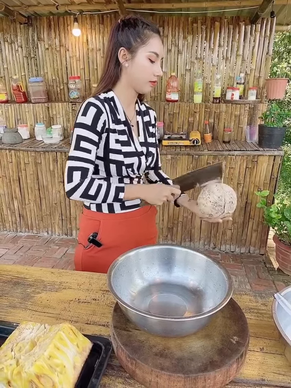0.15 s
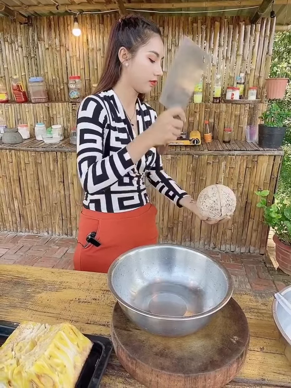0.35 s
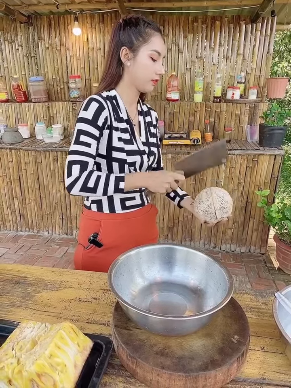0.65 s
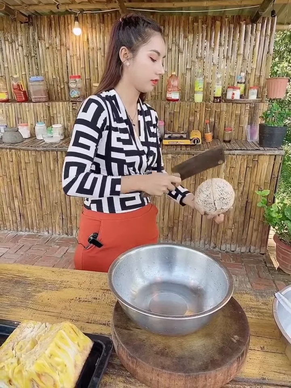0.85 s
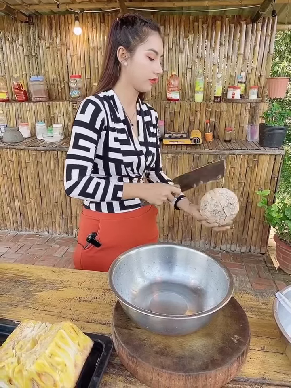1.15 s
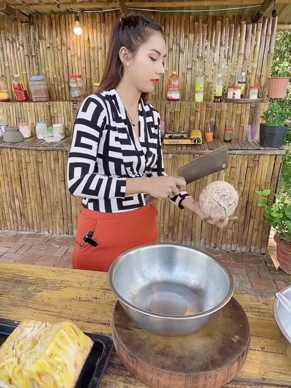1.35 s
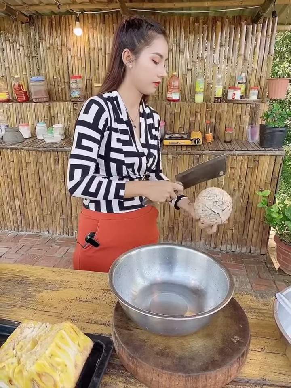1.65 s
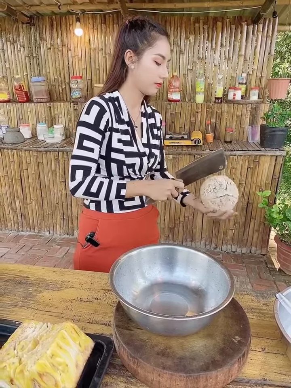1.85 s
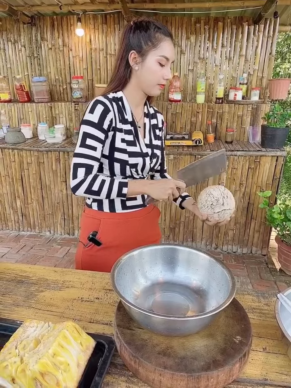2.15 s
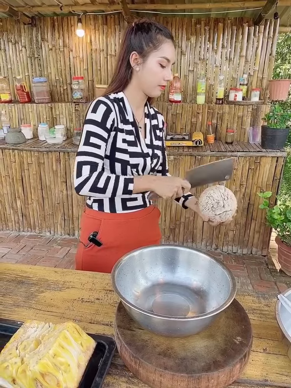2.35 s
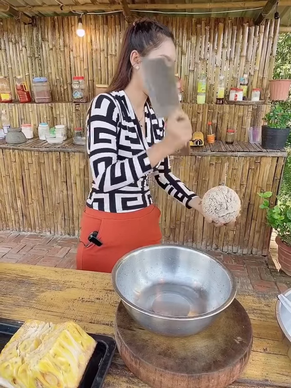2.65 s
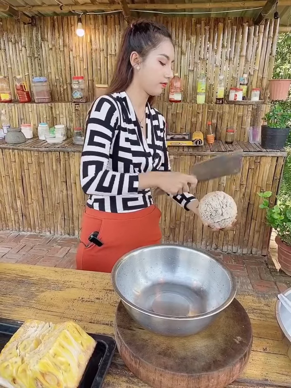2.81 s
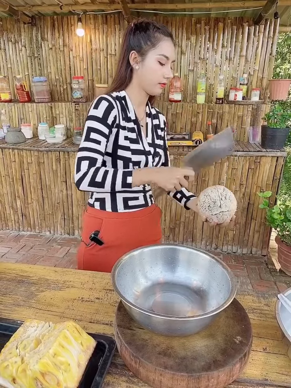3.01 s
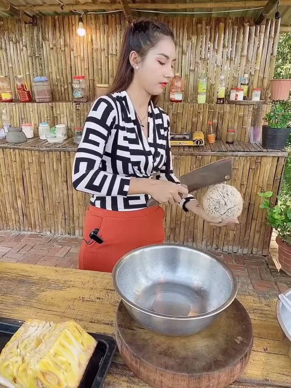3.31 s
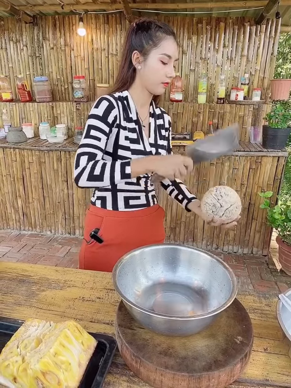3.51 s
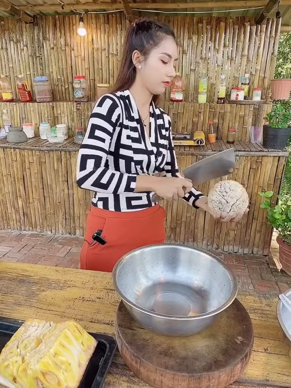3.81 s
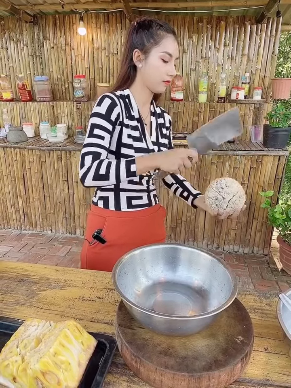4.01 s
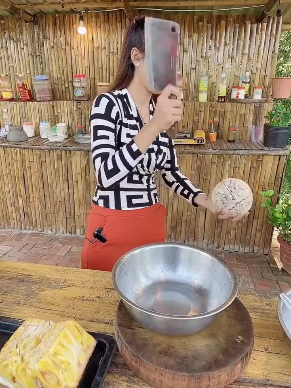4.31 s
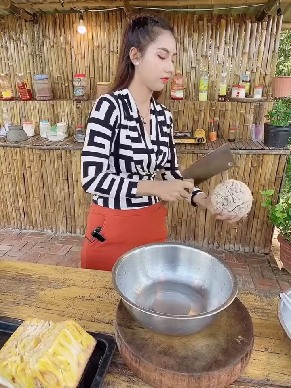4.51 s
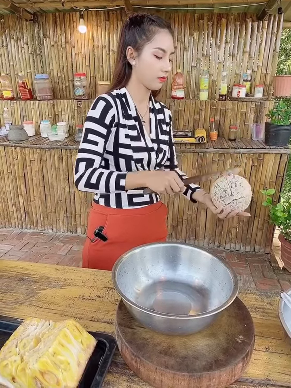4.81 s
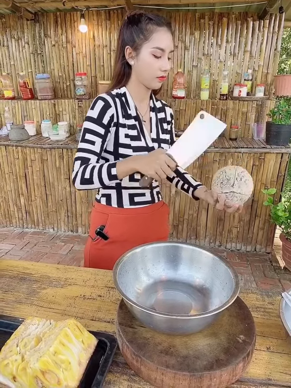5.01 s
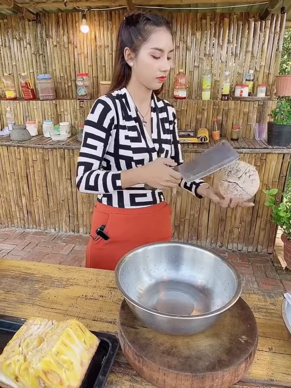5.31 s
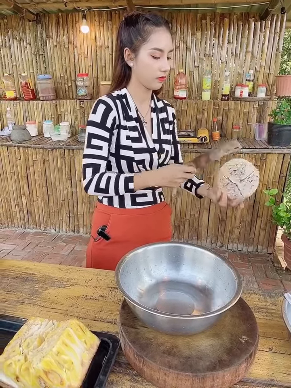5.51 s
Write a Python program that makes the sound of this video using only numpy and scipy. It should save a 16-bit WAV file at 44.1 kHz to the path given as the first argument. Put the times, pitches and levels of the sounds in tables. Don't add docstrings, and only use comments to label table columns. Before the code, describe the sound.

Sharp, crackling coconut knocks come close to a phone microphone and clip it slightly. After the first blow there is a pause with chick peeps and fingers brushing husk, then five strikes of varied strength, some with steely ringing. Small water glugs sound between blows. Nearby bamboo walls give a short, scattered echo over distant insects and low wind.

```python
import sys
import numpy as np
from scipy import signal
from scipy.fft import rfft, irfft
from scipy.io import wavfile
from scipy.ndimage import uniform_filter1d

SR = 44100
rng = np.random.default_rng(int(sys.argv[2]) if len(sys.argv) > 2 else 0)


def unload_wav(signal):
    wavfile.write(
        sys.argv[1],
        SR,
        np.round(np.clip(np.atleast_2d(signal).T, -1, 1) * 32767).astype(np.int16),
    )


def makeup_ratio(level_db):
    decades = np.asarray(level_db, float) / 20
    return 10 ** decades


N = 249606
LEAD = SR // 2
CRACKED_S = 1.5
BRIGHT_HZ = 1500

# (frequency [Hz], time to fade 60 dB [s])
SHED_NEAR = [(100, 0.067), (300, 0.047), (1000, 0.14), (4000, 0.15), (9000, 0.12), (11000, 0.093),
             (15000, 0.03)]


def evened(x):
    return x / np.sqrt(np.mean(x ** 2) + 1e-20)


def read(points, hz):
    f, value = np.transpose(points)
    return np.interp(np.log(hz + 1), np.log(f + 1), value)


def add(mix, s, sound):
    part = mix[round(s * SR) + LEAD:][:len(sound)]
    part += sound[:len(part)]


def uneven(size, samples):
    return evened(uniform_filter1d(rng.standard_normal(size), samples))


def coloured(points, size):
    gain = makeup_ratio(read(points, np.fft.rfftfreq(size, 1 / SR)))
    return evened(irfft(rfft(rng.standard_normal(size)) * gain, size))


def causal(points):
    half = np.log(makeup_ratio(np.maximum(read(points, np.fft.rfftfreq(4096, 1 / SR)), -100)))
    whole = np.concatenate([half, half[-2:0:-1]])
    taps = np.fft.ifft(np.exp(whole - 1j * signal.hilbert(whole).imag)).real[:2048]
    return taps / np.linalg.norm(taps)


def resonate(x, hz, width):
    turn = np.exp(2j * np.pi * np.cumsum(hz * np.ones(len(x))) / SR)
    r = np.exp(-np.pi * width / SR)
    return 2 * (turn * signal.lfilter([1 - r], [1, -r], x / turn)).real


def ringing(hz, db, t60, t):
    level_db = db[:, None] - 60 * np.maximum(t - .04, -.02) / t60[:, None]
    return makeup_ratio(level_db) * np.sin(2 * np.pi * hz[:, None] * t)


def echo_tail(decays):
    taps = np.zeros(SR)
    at = np.arange(260, SR - 20, 20)
    taps[at + rng.integers(0, 20, len(at))] = rng.choice([-1., 1.], len(at))
    hz, t, z = signal.stft(taps, SR, nperseg=256)
    fade = makeup_ratio(-60 * t / read(decays, hz)[:, None])
    tail = signal.istft(z * fade, SR, nperseg=256)[1]
    return tail / np.linalg.norm(tail)


def shed(x):
    # (frequency [Hz], time to fade 60 dB [s])
    far_walls = [(100, 0.27), (600, 0.61), (2000, 0.54), (5000, .65), (8500, 0.38), (12000, 0.62),
                 (14500, 0.094)]
    return signal.fftconvolve(x, echo_tail(SHED_NEAR) + makeup_ratio(-20) * echo_tail(far_walls))


def patchy_top(x):
    top = signal.oaconvolve(x, signal.firwin(255, 12550, pass_zero=False, fs=SR), "same")
    missing = 1. * (uneven(N, 3000) < 0)
    return x - top * uniform_filter1d(missing, 600)


def insects():
    # (frequency [Hz], level [dB per Hz])
    hiss_colour = [(90, -27), (150, 2.5), (250, -5), (450, -3), (1000, -14.5), (2500, -15.5), (7200, -21),
                   (8600, -13.5), (9700, -21), (11400, -13.5), (12400, -16), (12600, -26.5), (14700, -29.5),
                   (15700, -45)]
    level_db = -59.5 + .8 * uneven(N, 6000)
    return patchy_top(makeup_ratio(level_db) * coloured(hiss_colour, N))


def breeze():
    # (frequency [Hz], level [dB per Hz])
    rumble_colour = [(5.9, -26), (10, 4.5), (64, -6), (85, -6.5), (103, -10), (140, -16), (250, -33),
                     (320, -47), (550, -120)]
    # (time [s], level [dB])
    gusts = [(0.0, -51.5), (0.65, -50), (2.11, -51), (3.01, -50.5), (3.47, -49.5), (3.91, -48.5),
             (4.34, -51), (4.76, -46), (5.04, -54), (5.66, -52)]
    gust_db = np.interp(np.arange(N) / SR, *np.transpose(gusts))
    return makeup_ratio(gust_db + 3.1 * uneven(N, 2500) + 3.0) * coloured(rumble_colour, N)


def peep(s, length, top_hz, first_db, other_db):
    u = np.linspace(-1, 1, round(length * SR))
    rising = u < 0
    hz = top_hz * (1 - np.where(rising, .5, .55) * abs(u) ** np.where(rising, 2.1, 2.4))
    turns = 2 * np.pi * np.cumsum(hz) / SR
    hoarse, patchy = evened(uniform_filter1d(rng.standard_normal((2, len(u))), 120))
    first = makeup_ratio(first_db - np.where(rising, 95, 65) * u ** 4 + 1.5 * hoarse) * np.sin(turns)
    second = makeup_ratio(-68.5 + 9 * u ** 2 * rising + 3 * patchy) * np.sin(2 * turns)
    other_hz = 11150 - 1300 * np.exp(-(u + 1) / 0.5)
    other = makeup_ratio(other_db + 4.0 * hoarse) * np.sin(2 * np.pi * np.cumsum(other_hz) / SR)
    return s, np.sqrt(2) * (first + second + other) * signal.windows.tukey(len(u), .3)


def chicks():
    # (time [s], length [s], top pitch [Hz], first partial [dB], neighbour's whistle [dB])
    peeps = [(0.19, .082, 4703, -55.5, -97), (0.492, 0.11, 4796, -56, -71), (1.087, .12, 5024, -49, -74),
             (1.425, .13, 4986, -52.5, -71), (3.7, .09, 4326, -69.5, -90), (5.05, .085, 4212, -64, -91.5),
             (5.36, .11, 4850, -58, -79), (5.612, .085, 5030, -55.5, -80)]
    # (frequency [Hz], time to fade 60 dB [s])
    hen_yard = [(3000, .4), (6000, .35), (11000, .15)]
    mix = np.zeros(N + LEAD)
    for row in peeps:
        add(mix, *peep(*row))
    mix += makeup_ratio(-5.5) * signal.fftconvolve(mix, echo_tail(SHED_NEAR))[:len(mix)]
    mix += makeup_ratio(-11) * signal.fftconvolve(mix, echo_tail(hen_yard))[:len(mix)]
    return mix


def touch(s, db, hz, t60):
    t = np.arange(2500) / SR
    scrape = resonate(resonate(rng.standard_normal(len(t)), hz, hz), hz, 0.71 * hz)
    return s, makeup_ratio(db - 60 * t / t60) * evened(scrape)


def glug(s, db, start_hz, end_hz, t60):
    t = np.arange(round(t60 * SR)) / SR
    hz = end_hz + (start_hz - end_hz) * np.exp(-t / (0.13 * t60))
    tone = np.sin(2 * np.pi * np.cumsum(hz) / SR) * (1 - np.exp(-t / 0.0011))
    return s, makeup_ratio(db - 60 * (t / t60) ** 1.1) * tone


def steady_ring(s, db, hz, t60):
    return glug(s, db, hz, hz, t60)


def swing(end, db, length, hz):
    rise = np.linspace(0, 1, round(length * SR))
    rising_hz = hz * (.7 + .5 * rise)
    air = resonate(resonate(rng.standard_normal(len(rise)), rising_hz, 300), rising_hz, 400)
    return end - length, makeup_ratio(db) * evened(air) * rise ** 1.1


def hollow(x):
    return signal.sosfilt(signal.butter(4, 270, "high", fs=SR, output="sos"), x)


def tilt_db(hz, bright_db):
    octaves = max(np.log2(hz / BRIGHT_HZ), 0)
    return bright_db * (min(octaves, 1.1) if bright_db < 0 else octaves)


def crackling(t60, t):
    noise = rng.standard_normal(SR)
    lumps_db = 3.0 * evened(uniform_filter1d(noise[::-1], size=160))
    crackle = noise * makeup_ratio(-60 * t / t60 + lumps_db)
    top = signal.sosfilt(signal.butter(2, 9400, "high", fs=SR, output="sos"), crackle)
    crackle -= top * (1 - makeup_ratio(-60 * t / 0.34))
    crackle[0] += 4.0
    return crackle


def knocked_shell(s, knock_db, bright_db, tap):
    # (frequency [Hz], level [dB per Hz])
    full_colour = [(88, -48), (150, -16), (370, 0), (900, -7), (1740, -8), (2400, -9), (9000, -19.5),
                   (15700, -34.5)]
    tap_colour = [(88, -44.5), (240, -26.5), (400, 0), (1200, -5.5), (1760, -1.5), (3300, -9),
                  (6000, -21.5), (15700, -33.5)]
    colour = []
    for f, db in (full_colour, tap_colour)[tap]:
        early_db = -5 * (s < CRACKED_S and f < BRIGHT_HZ)
        colour.append((f, db + tilt_db(f, bright_db) + early_db))
    return makeup_ratio(knock_db) * hollow(np.pad(causal(colour), (0, 2048)))


def shell_thud(s, thud_db, bright_db, tap, t):
    # (frequency [Hz], time to fade 60 dB [s], full blow [dB], tap [dB])
    thud_modes = [(316, 0.12, -8, -31), (415, 0.063, -11.5, -6), (654, .05, -13.5, -29),
                  (883, 0.021, -16.5, -6), (1400, 0.014, -13.5, -17.5), (2440, 0.016, -3.5, -9.5),
                  (3208, 0.012, 0.7, -14.5)]
    thuds = []
    for f, fade, *db in thud_modes:
        level_db = thud_db + db[tap] + tilt_db(f, bright_db) - 60 * t / fade
        thuds.append(makeup_ratio(level_db) * np.sin(2 * np.pi * f * t))
    return hollow(makeup_ratio(-13.5 * (s < CRACKED_S)) * thuds[0] + sum(thuds[1:]))


def shell_ring(thud_db, tap, t):
    # (frequency [Hz], time to fade 60 dB [s], full blow [dB], tap [dB])
    shell_modes = [(333.6, 0.28, -27.5, -53.5), (464.7, .18, -24.5, -42), (528, .17, -37, -69.5),
                   (619, 0.14, -27, -56.5), (799, 0.15, -29.5, -49.5), (958, 0.1, -34, -60),
                   (1195, 0.22, -36, -40.5)]
    hz, ring_s, *db = np.transpose(shell_modes)
    return ringing(hz, db[tap] + thud_db, ring_s, t).sum(0)


def blade(place, hum_db, over_db, grip, tap, t):
    overtone_hz = [2118, 4538, 5184, 8107, 8870, 9160, 10160, 10735, 10850, 11390, 12230, 12920, 13610]
    # (time to fade 60 dB [s], struck at heel [dB], middle [dB], tip [dB], tap [dB])
    overtones = [(0.12, -52, -27.5, -31, -44.5), (0.22, -42.5, -44, -31, -70.5), (.3, -25, -48, -28, -44.5),
                 (.1, -50.5, -46.5, -33, -47.5), (.12, -57.5, -59, -41.5, -79),
                 (0.078, -44, -39.5, -25.5, -68), (0.17, -35, -44.5, -60.5, -82.5),
                 (0.1, -70.5, -61, -28, -80), (0.12, -44, -24.5, -58, -72), (.45, -51.5, -76, -51.5, -70.5),
                 (.25, -53.5, -64, -63, -85), (.15, -67.5, -75, -38, -70.5), (0.076, -69, -64.5, -32, -76)]
    hz = np.array(overtone_hz)
    t60, heel, middle, tip, glancing = np.transpose(overtones)
    u = 2 * np.clip(place, 0, 1)
    db = glancing if tap else heel + (middle - heel) * min(u, 1) + (tip - middle) * max(u - 1, 0)
    modes = ringing(hz, db + over_db, np.where(t60 > .4, grip * t60, t60), t)
    modes[2] *= abs(1 - 0.64 * np.exp(2j * np.pi * 9 * t))
    hum = ringing(*np.array([[1728], [hum_db], [grip * .5]]), t)[0]
    return modes.sum(0) + hum * abs(1 + .7 * np.exp(2j * np.pi * 4.5 * t - t / 0.089))


def deep_drift(t):
    drift = coloured([(8, -9.5), (22, 1), (45, -13.5), (110, -28.5), (300, -78.5)], SR)
    return drift * t / 0.049 * np.exp(1 - t / 0.028)


def blow(row, hit):
    s, knock_db, t60, bright_db, thud_db = row
    tap = int(t60 < .05)
    t = np.arange(SR) / SR
    crackle = crackling(t60, t)
    shell = knocked_shell(s, knock_db, bright_db, tap)
    thud = shell_thud(s, thud_db, bright_db, tap, t)
    ring = (shell_ring(thud_db, tap, t) + blade(*hit, tap, t)) * (1 - np.exp(-t / 0.0084))
    scattered = np.pad(shell, (0, SR - len(shell))) * np.linalg.norm(crackle)
    wet = shed(scattered + 0.077 * thud + 0.028 * ring)[:SR]
    direct = signal.fftconvolve(crackle, shell)[:SR] + thud + ring
    shed_db = -4 + 31 * np.log10(t60 / 0.12)
    return s, direct + makeup_ratio(shed_db) * (wet + makeup_ratio(knock_db - 15) * deep_drift(t))


def scene():
    # (time [s], level [dB], pitch [Hz], time to fade 60 dB [s])
    touches = [(.613, -54, 1700, .01), (1.484, -47, 1500, .022), (1.56, -58, 3300, .015),
               (1.871, -45, 600, .05), (1.872, -56, 3000, .02), (1.894, -40, 2800, .014),
               (1.895, -47, 550, .04), (1.916, -50, 8000, .008), (1.917, -48, 600, .04),
               (1.925, -51, 4000, .012), (1.929, -53, 3000, .012), (2.05, -60, 2300, .02),
               (2.841, -57, 4500, .01), (3.548, -60, 4000, .03), (3.935, -58, 7000, .03),
               (4.9, -64, 8000, .06), (4.965, -58, 2500, .02), (5.156, -60, 2500, .025)]
    # (time [s], level [dB], start pitch [Hz], end pitch [Hz], time to fade 60 dB [s])
    glugs = [
        (.257, -31, 540, 560, .045),
        (.272, -42, 620, 780, .08),
        (3.635, -43, 2050, 2100, .05),
        (3.647, -55, 2400, 3300, .03),
        (5.225, -62, 4900, 4700, .05),
    ]
    # (time [s], level [dB], pitch [Hz], time to fade 60
    # dB [s])
    further_rings = [(5.155, -49, 1728, .65), (5.16, -60, 2120, .2), (4.7, -65, 11540, 4.5),
                     (4.75, -66, 10850, 1.2), (2.95, -68, 12920, .8), (3.5, -58, 1729, .8),
                     (.8, -51, 4716, .4), (.826, -41, 5190, .4), (.76, -62, 11390, .5), (2.5, -63, 11390, .5),
                     (2.49, -78, 13610, 2.5), (2.52, -79, 14295, 2.5), (2.6, -79, 12915, 2.5),
                     (3.288, -48, 7400, .06), (3.287, -39, 9160, .12), (2.458, -36, 6700, .05),
                     (2.4565, -14, 2600, .03), (3.288, -46, 3150, .05), (3.96, -30, 9170, .1)]
    # (end time [s], level [dB], length [s], pitch [Hz])
    swings = [(.706, -49, .06, 497), (2.895, -42.5, .05, 553), (3.953, -42.5, .035, 550),
              (4.636, -45.5, .04, 610)]
    # (time [s], knock [dB], crackle's time to fade 60 dB [s], brightness [dB per octave], thud [dB])
    blows = [
        (-.3, 1, 0.16, -3.5, -50),
        (.7067, -1.5, 0.12, -1, 0.5),
        (2.4561, -0.5, .034, 0.4, -3.5),
        (2.8962, -2.5, 0.11, 3, 0.24),
        (3.2859, -14.5, 0.041, -11.5, -4),
        (3.9543, 3, .088, 1.2, -0.07),
        (4.638, 0.5, 0.082, -0.25, 0.27),
    ]
    # (place struck [0 heel, .5 middle, 1 tip], hum [dB], overtones [dB],
    # grip [factor on the long rings])
    blade_hits = [(.1, -9, -50, .94), (.01, -6.5, -0.34, 0.9), (0.13, -27.5, 0.3, .7),
                  (1, -20.5, 2.7, 0.96), (1, -29, -15.5, 0.81), (0.23, -16.5, 10, .94),
                  (.49, -18.5, 2.4, 1.4)]
    near = np.zeros(N + LEAD)
    for rows, source in ((touches, touch), (glugs, glug), (further_rings, steady_ring), (swings, swing)):
        for row in rows:
            add(near, *source(*row))
    for row, hit in zip(blows, blade_hits):
        add(near, *blow(row, hit))
    return ((near + chicks())[LEAD:] + insects() + breeze())[None]


def top_cut(x):
    return signal.sosfilt(signal.butter(12, 15850, fs=SR, output="sos"), x)


def record(dry):
    overloaded = np.clip(dry, -.97, .97)
    return top_cut(overloaded)


dry = scene()
out = record(dry)
unload_wav(out)
```